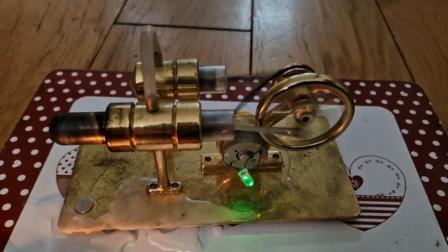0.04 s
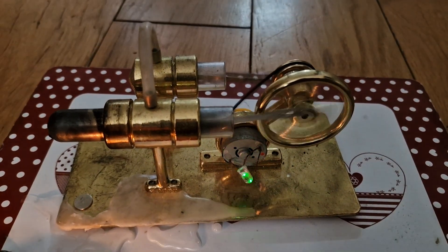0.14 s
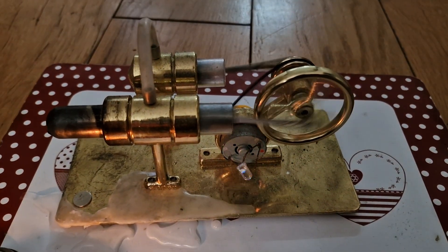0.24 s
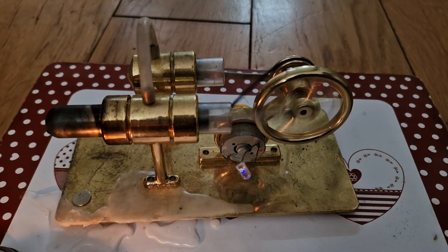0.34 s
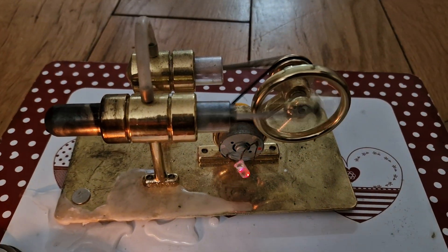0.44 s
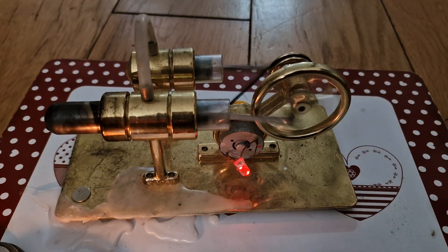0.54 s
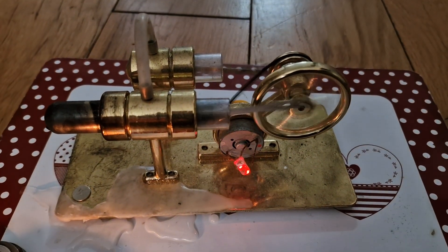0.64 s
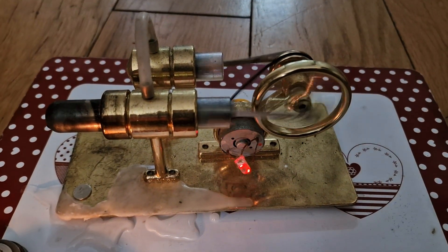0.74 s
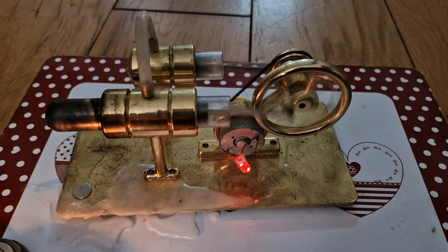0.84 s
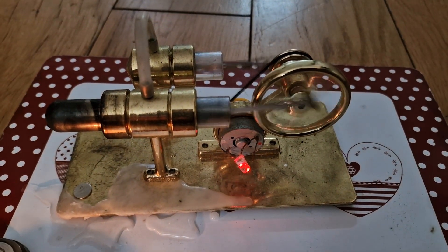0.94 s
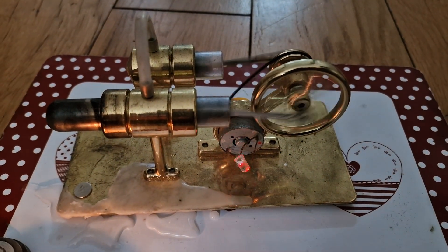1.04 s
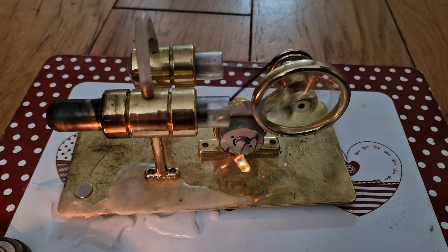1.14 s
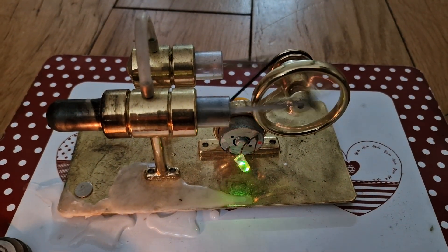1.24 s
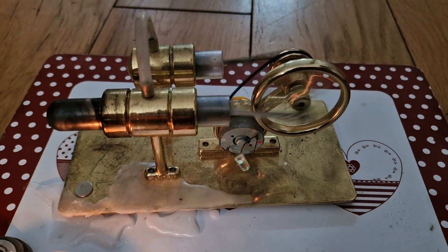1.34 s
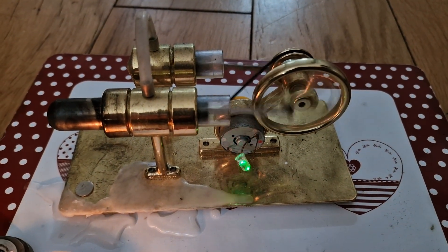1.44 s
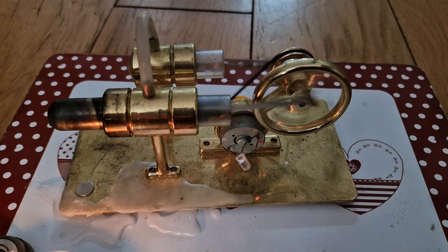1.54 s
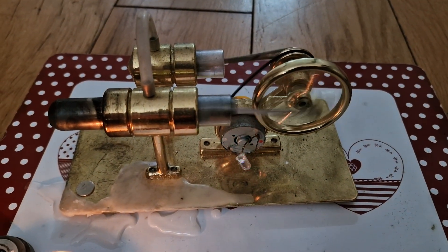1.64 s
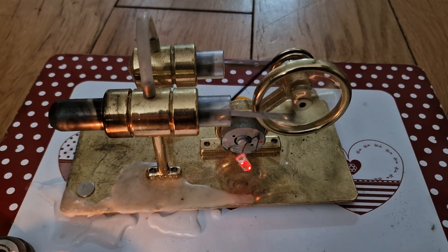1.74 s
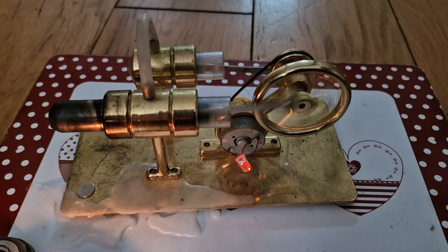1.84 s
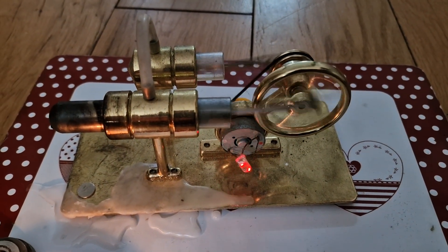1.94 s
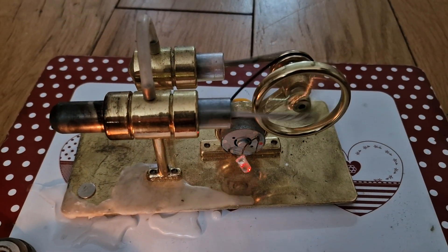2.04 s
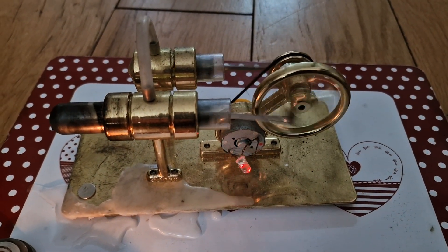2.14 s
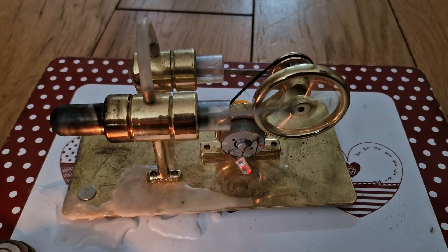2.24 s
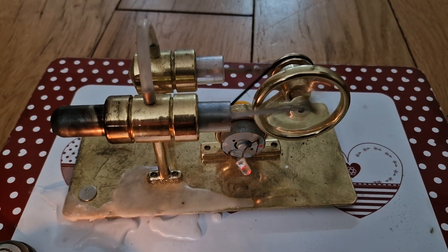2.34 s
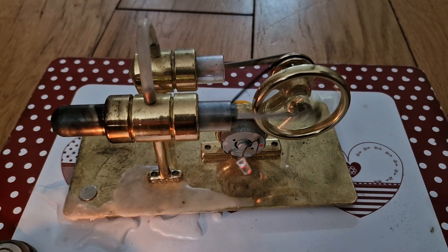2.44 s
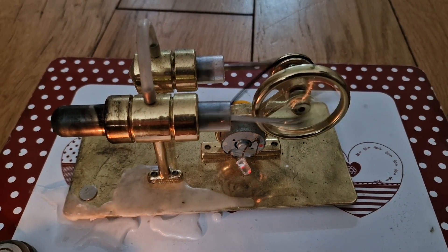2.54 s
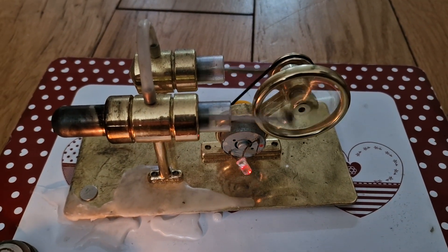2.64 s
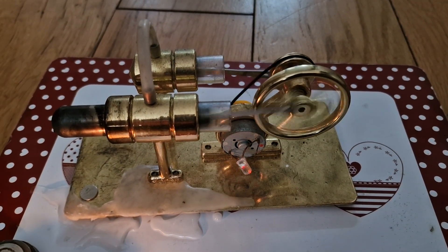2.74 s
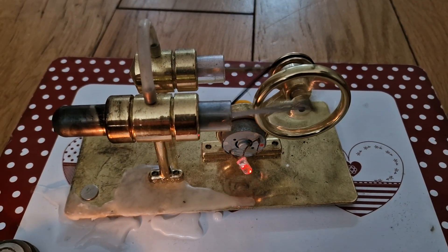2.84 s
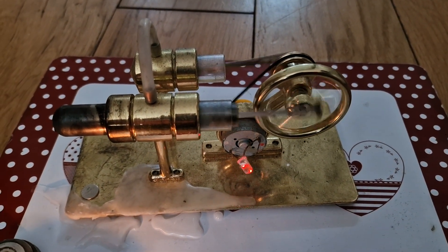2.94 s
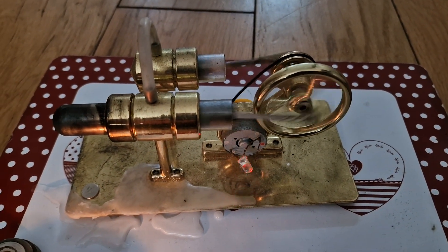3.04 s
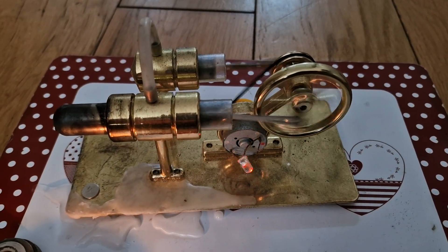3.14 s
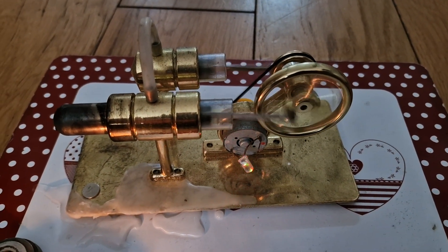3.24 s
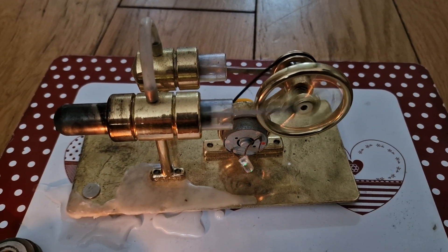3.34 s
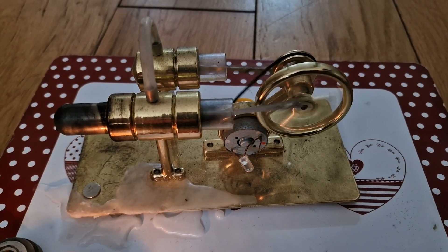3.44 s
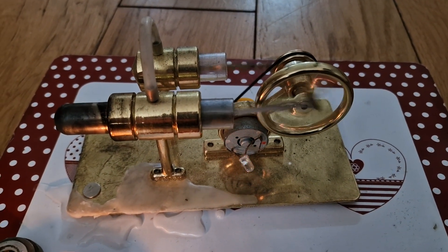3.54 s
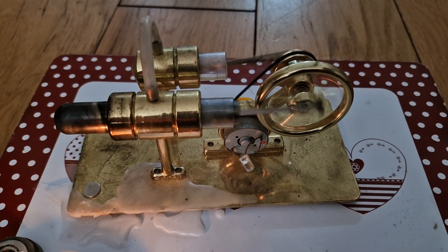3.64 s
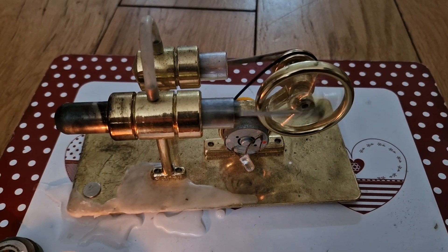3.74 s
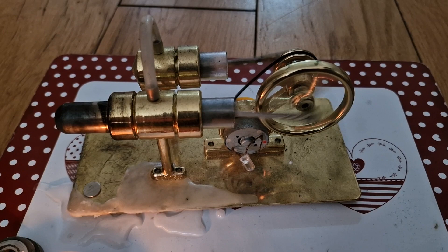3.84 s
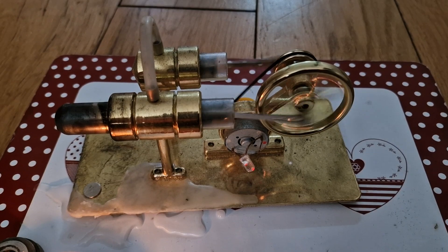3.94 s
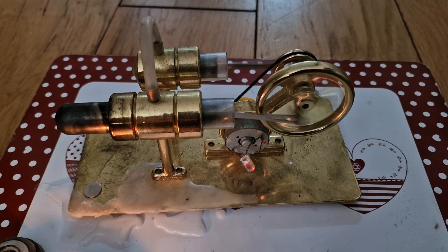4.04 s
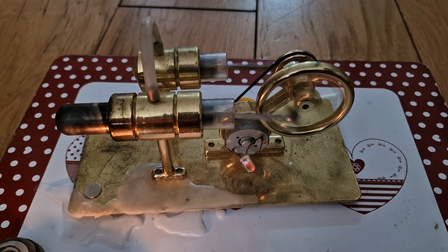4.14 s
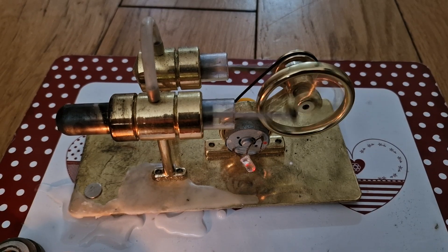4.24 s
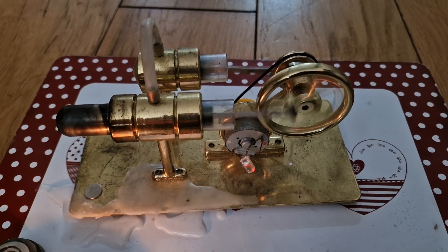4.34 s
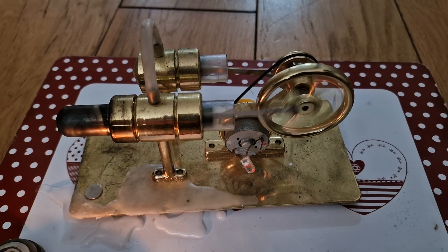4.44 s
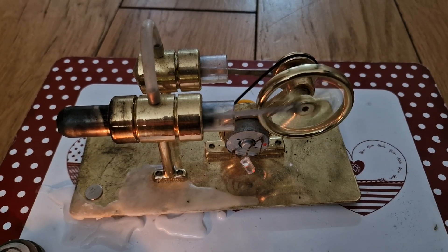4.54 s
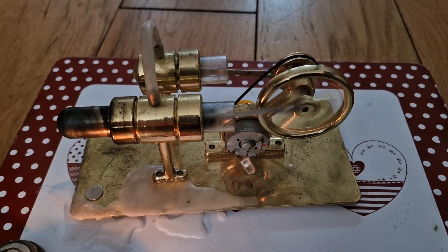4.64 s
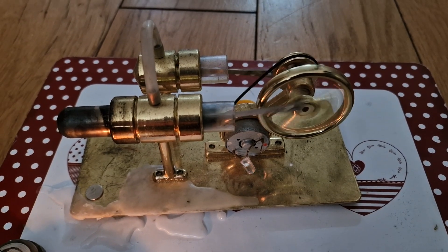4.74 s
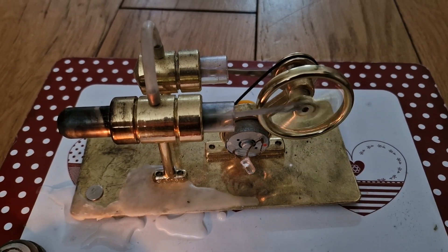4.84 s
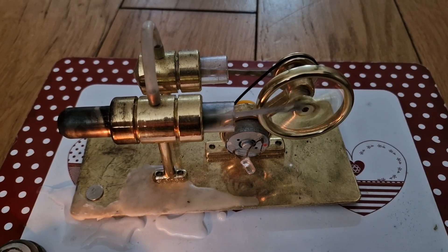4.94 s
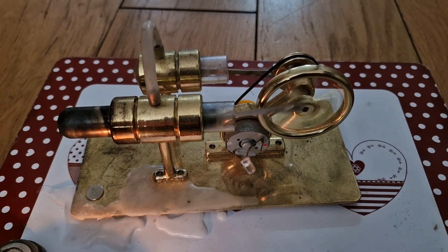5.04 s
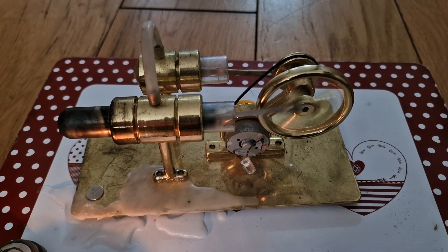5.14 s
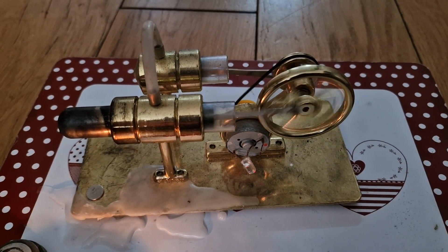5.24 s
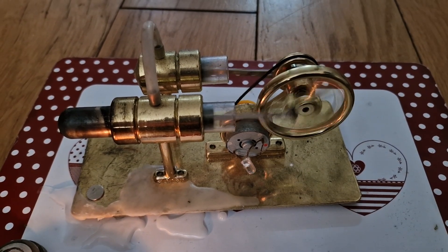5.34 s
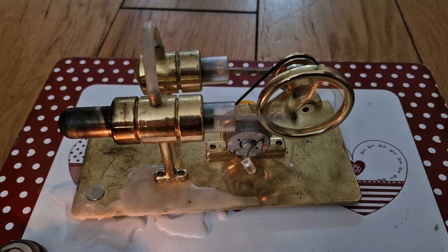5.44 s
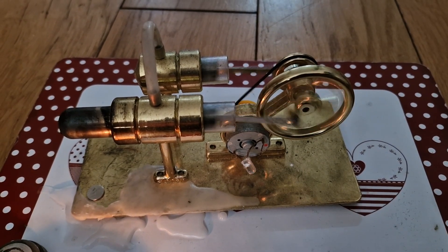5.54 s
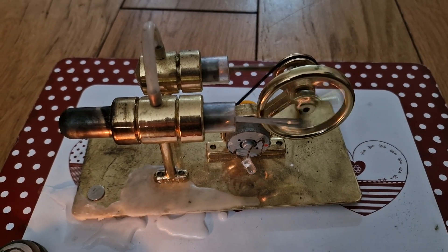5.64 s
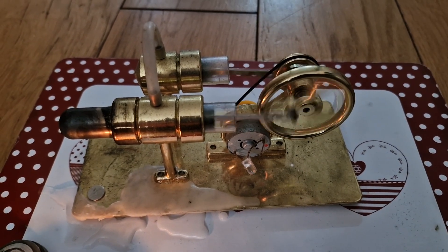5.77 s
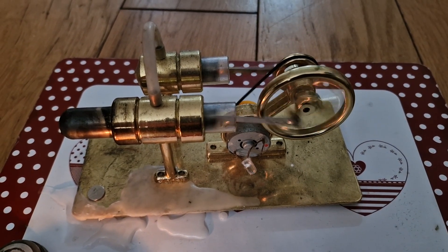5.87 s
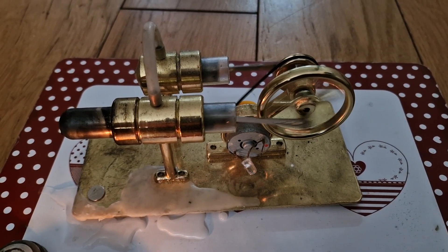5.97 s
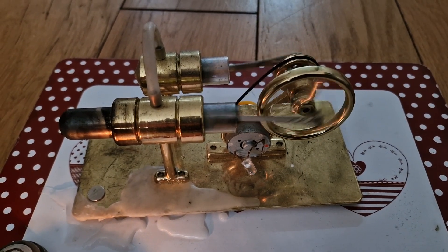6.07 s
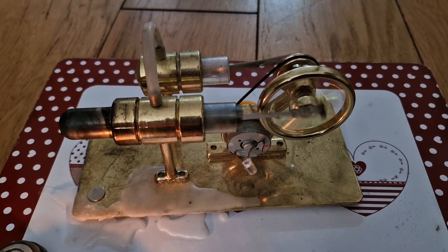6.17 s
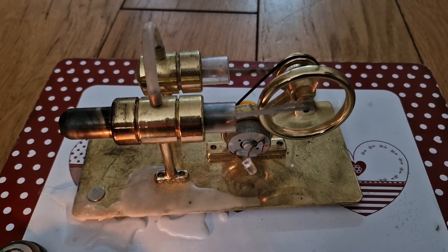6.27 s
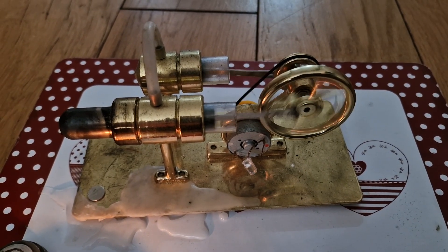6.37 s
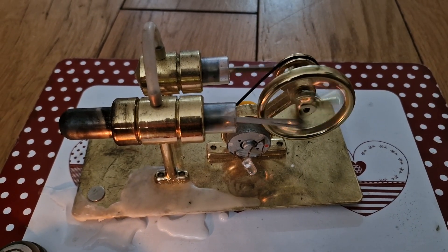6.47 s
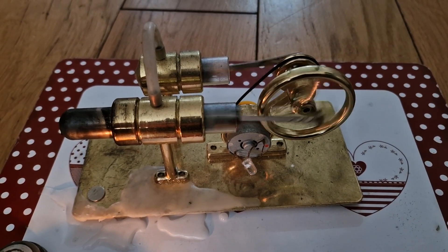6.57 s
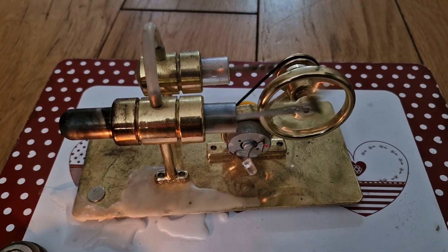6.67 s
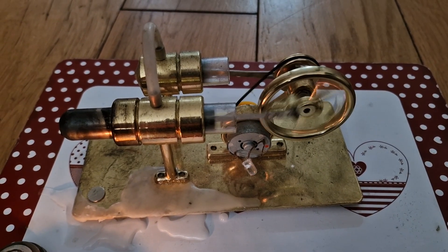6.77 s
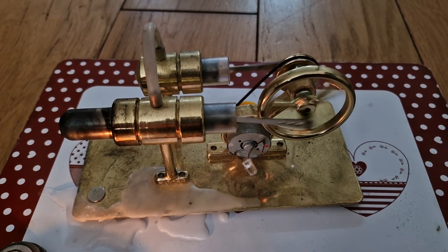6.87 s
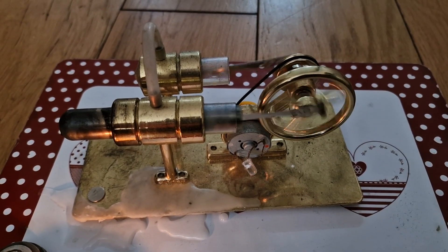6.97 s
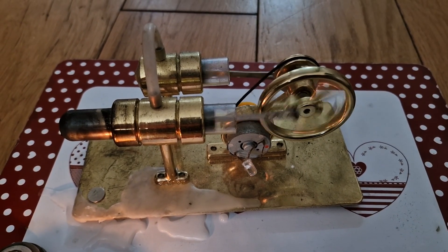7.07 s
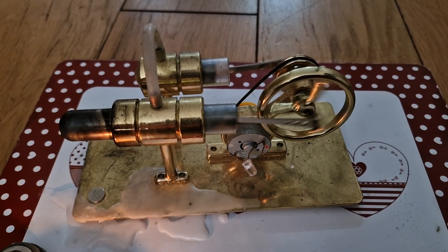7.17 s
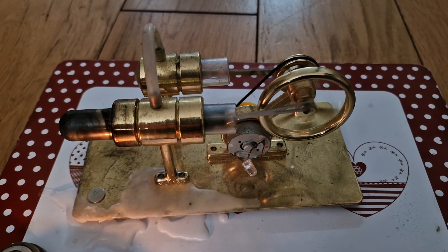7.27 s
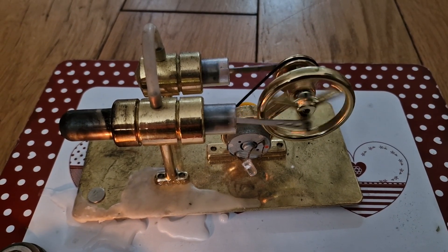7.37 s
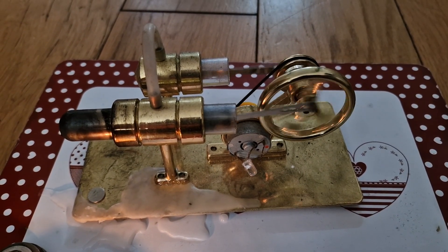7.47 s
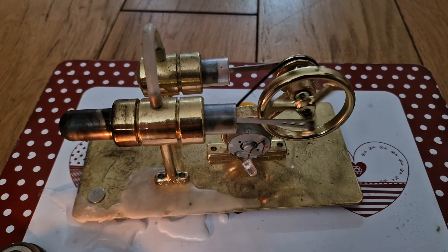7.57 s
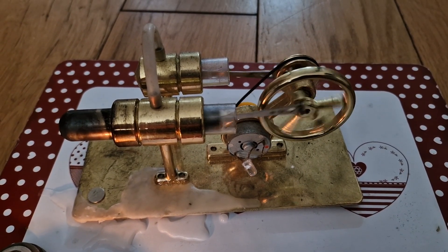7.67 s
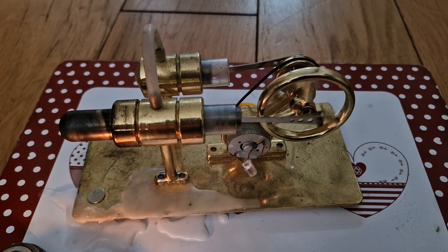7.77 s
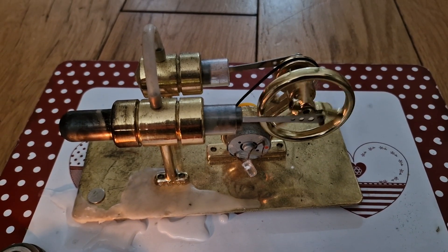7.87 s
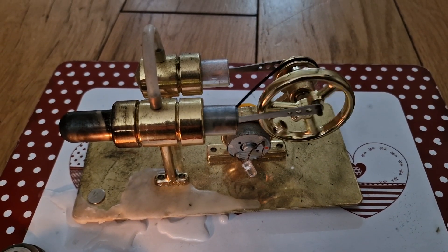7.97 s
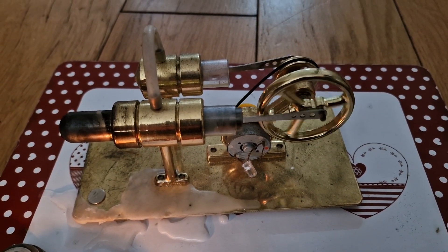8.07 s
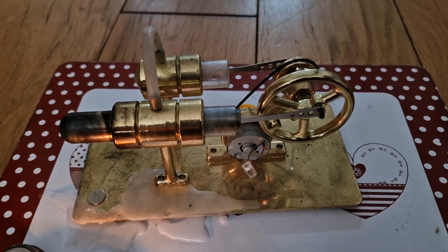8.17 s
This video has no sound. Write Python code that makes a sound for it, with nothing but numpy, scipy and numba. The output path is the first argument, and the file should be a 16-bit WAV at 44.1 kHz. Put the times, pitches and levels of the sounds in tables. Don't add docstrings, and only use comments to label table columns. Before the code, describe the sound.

Close, rapid metallic rattling of a miniature hot-air engine runs down over eight seconds, becomes separate uneven clacks, and stops with a faint sigh.

```python
import sys
import numpy as np
from scipy import signal
from scipy.fft import rfft, irfft
from scipy.io import wavfile
from scipy.ndimage import uniform_filter1d
from numba import njit

SR = 44100
rng = np.random.default_rng(int(sys.argv[2]) if len(sys.argv) > 2 else 0)


def to_wav(sig):
    pcm = np.clip(np.atleast_2d(sig), -1, 1) * 32767
    pcm = np.round(pcm).astype(np.int16)
    wavfile.write(sys.argv[1], SR, pcm.T)


def to_linear_factor(level_db):
    exponent = np.asarray(level_db, float) / 20
    return 10 ** exponent


N = 362042
T = np.arange(N) / SR

FLOOR_HZ = [250, 340, 440]
BASE_HZ = [560, 640, 715, 800, 950, 1175, 1260, 1410, 1600]
CYLINDER_HZ = [1900, 2070, 2250, 2560, 2670, 2790, 2845, 3200]
ROD_HZ = [3600, 3790, 3915, 4062, 4180, 4400, 4700, 4790, 5100, 5400, 5600, 5643, 5998, 6230, 6800, 7300,
          7720]
GLASS_HZ = [8130, 8250, 8355]
PIN_HZ = [9300, 10700, 11600, 12600, 13200, 13720, 14050, 14700, 15450]
AIR_HZ = [4400, 4180]
# t60_s, peak_db, left_minus_right_db, left_lead_rad
FLOOR_MODES = [(0.076, -18, -11, -0.8), (0.029, -12.5, 0, 0), (0.089, -10, -3, 2.5)]
BASE_MODES = [(0.072, -14, 6, 0.8), (0.04, -14, 3.5, 0.4), (0.049, -9.5, 1, -1), (0.063, -11.5, 0.5, -1.36),
              (0.016, -18, -0.5, 1.14), (0.076, -9, 12, 0.1), (0.034, -8.5, 0, -1.14),
              (0.023, -16, 10.5, -0.5), (0.082, -13.5, -7.5, -3.5)]
CYLINDER_MODES = [(0.027, -20, 1.6, 0.6), (0.041, -9.5, 6.9, 2), (0.0065, -14.5, 1.9, 5),
                  (0.09, -11.5, 21.2, 4), (0.059, -4, 0.84, 2.5), (0.14, -2.5, 1.3, -1.5),
                  (0.08, -16.5, 1.4, -5.5), (0.039, -16, 0.41, -6)]
ROD_MODES = [(0.14, 3.5, 4, -2.5), (0.0064, -7.5, 9.5, -0.8), (0.041, 11.5, 1.5, 0.86),
             (0.18, 9.5, -8, 0.96), (0.073, 8.5, 12.5, 3.5), (0.039, 0.5, -21.5, -1.5), (0.019, 6, -5, 4),
             (0.065, -7, 14, -5), (0.0043, -2.5, -1, 3.5), (0.0042, -9, -9, 6.5), (0.088, -6.5, -23.5, 2.5),
             (0.098, -21, -6, 3), (0.026, -3, -10, -2.5), (0.012, -8, -6, 4.5), (0.002, -14.5, 10.5, 1.9),
             (0.018, -10, 1, 0), (0.031, -2.5, -7, 1.5)]
GLASS_MODES = [(0.04, -4, 3.7, 0.66), (0.092, 0, 11, 0.97), (0.122, -1.5, 9.7, 1.4)]
PIN_MODES = [(0.0025, -23.5, 8, -2), (0.032, -19.5, -10.5, 1.5), (0.016, -25.5, -7.5, -2),
             (0.0044, -22.5, 3, -1.5), (0.0031, -38.5, 13, 0), (0.037, -13, 5.5, 1.5), (0.102, -19, 6, -10),
             (0.005, -23.5, 8, -9), (0.025, -18, 8, -7)]
AIR_MODES = [(0.048, 9, -5.5, -2.5), (0.05, 1, 0, 3)]
# angle_turns, spread_turns, level_over_rub_db
FLOOR_HITS = [(.41, 0.032, 11.5), (0.859, 0.04, 9.5)]
BASE_HITS = [(0.489, 0.068, 13.7), (0.895, 0.048, 9.3), (0.98, 0.062, 14)]
POST_HITS = [(.5, 0.013, 1.3), (.72, 0.082, 0.84), (.97, 0.057, 4)]
CYLINDER_HITS = [(0.521, 0.03, 1.4), (.72, 0.14, 2.5), (0.952, 0.028, 0.94)]
ROD_HITS = [(0.53, 0.061, 11.3), (0.99, 0.097, 16.3), (0.206, 0.028, 8.6), (0.682, 0.078, 5.3)]
LINK_HITS = [(0.52, 0.056, 9.7), (0.98, 0.083, 11), (0.22, 0.033, 2.8)]
SLIDE_HITS = [(.56, 0.14, 14)]
AIR_HITS = [(0.545, 0.09, 9.1), (0.0, 0.055, 9.2), (0.16, 0.11, 10.5)]
GLASS_HITS = [(0.182, 0.076, 15), (0.566, 0.016, 25), (.9, 0.096, 11.6)]
PIN_HITS = [(.24, 0.16, 9.1), (.53, 0.083, 4.7), (.93, 0.072, 10.3)]
# time_s, speed_turns_per_s
SPEED = [
    (0, 14.541),
    (2, 12.508),
    (4, 10.848),
    (5, 9.945),
    (6, 8.672),
    (7, 6.719),
    (7.4, 5.194),
    (8.21, 2.397),
]
# time_s, peak_db
TAPS = [(0.0378, -25), (0.0675, -17), (0.138, -18.5), (0.246, -23), (0.2773, -22), (0.322, -23.5),
        (0.459, -18), (0.4938, -31), (0.5287, -19), (0.7038, -25.5), (0.7456, -28), (0.782, -19.5),
        (0.82, -17), (0.8525, -23.5), (0.8939, -30), (0.968, -20), (0.9981, -18), (1.0427, -19.5),
        (1.1164, -18), (1.195, -18.5), (1.2215, -21), (1.271, -13), (1.339, -33), (1.4212, -22.5),
        (1.4518, -15), (1.533, -21), (1.6072, -22.5), (1.649, -20), (1.6806, -23), (1.729, -22),
        (1.762, -21.5), (1.839, -28), (1.8856, -15), (1.921, -23), (1.9664, -23), (2.0488, -16),
        (2.082, -23), (2.1283, -17), (2.164, -26.5), (2.2024, -24), (2.2902, -19.5), (2.3256, -26.5),
        (2.451, -14.5), (2.534, -15.5), (2.6484, -37), (2.7037, -20), (2.8736, -22), (2.957, -21),
        (2.996, -15), (3.047, -26.5), (3.2137, -15.5), (3.3025, -19.5), (3.394, -16), (3.5179, -27),
        (3.569, -19), (3.6002, -35), (3.6556, -16.5), (3.7409, -36), (3.837, -20), (3.963, -31.5),
        (4.0183, -25), (4.0582, -22), (4.1106, -15.5), (4.2052, -19), (4.2413, -37), (4.2682, -19.5),
             (4.3033, -18), (4.3907, -18), (4.433, -22), (4.4907, -21), (4.5336, -28), (4.547, -18.5),
             (4.6229, -22), (4.6773, -24.5), (4.779, -18.5), (4.8215, -24), (4.8405, -19), (4.9377, -20),
             (4.978, -22), (5.029, -17), (5.083, -21), (5.1417, -23), (5.1851, -19.5), (5.233, -23),
             (5.2856, -20.5), (5.5006, -20), (5.6032, -20), (5.7146, -18.5), (5.8377, -20), (5.9417, -16),
             (6.0776, -32), (6.1809, -23), (6.228, -19), (6.3086, -17.5), (6.349, -32), (6.4218, -23),
             (6.4776, -19), (6.558, -22), (6.607, -26), (6.7097, -29), (6.7441, -18.5), (6.8159, -29),
             (6.8324, -18), (6.8865, -15), (7.0274, -28), (7.059, -20.5), (7.1901, -21.5), (7.21, -17.5),
             (7.235, -15.5), (7.2884, -21.5), (7.3036, -14), (7.3563, -27), (7.3727, -22.5), (7.4738, -18),
             (7.5, -21.5), (7.5553, -24.5), (7.5804, -31), (7.6136, -16), (7.7026, -23), (7.7134, -16)]
# time_s, peak_db
THUMPS = [(0.064, -28), (0.135, -25.5), (0.201, -33), (0.244, -37), (0.276, -31.5), (0.387, -35),
          (0.453, -24.5), (0.487, -24), (0.53, -36), (0.56, -26), (0.601, -35), (0.626, -41), (0.748, -35),
          (0.776, -21), (0.82, -24.5), (0.85, -27.5), (0.995, -23.5), (1.041, -32), (1.189, -29),
          (1.22, -25), (1.295, -24), (1.415, -31), (1.447, -24.5), (1.57, -30), (1.641, -31),
          (1.677, -26.5), (1.72, -33), (1.755, -26), (1.834, -31), (1.884, -37), (1.913, -27), (1.958, -31),
          (1.993, -24), (2.072, -25.5), (2.153, -29), (2.192, -30), (2.236, -25), (2.313, -39),
          (2.358, -40), (2.533, -32.5), (2.562, -30.5), (2.611, -40), (2.645, -29.5), (2.689, -32),
          (2.728, -40), (2.817, -31), (2.853, -30), (2.899, -25), (2.983, -28.5), (3.07, -34.5),
          (3.122, -36), (3.155, -30), (3.202, -27), (3.242, -35), (3.297, -29.5), (3.335, -28),
          (3.418, -29), (3.509, -29), (3.561, -38), (3.596, -31.5), (3.649, -28), (3.689, -27),
               (3.82, -35.5), (3.963, -29.5), (4.005, -31), (4.055, -25.5), (4.204, -28.5), (4.24, -23.5),
               (4.333, -29), (4.389, -32), (4.43, -24), (4.478, -36), (4.582, -31), (4.613, -32),
               (4.669, -37), (4.715, -35.5), (4.775, -29.5), (4.874, -32.5), (4.913, -30.5), (4.972, -27.5),
               (5.015, -30.5), (5.075, -37.5), (5.174, -32), (5.221, -27), (5.284, -24.5), (5.328, -23.5),
               (5.386, -28), (5.428, -33.5), (5.486, -33), (5.54, -27.5), (5.601, -23.5), (5.716, -27.5),
               (5.824, -28.5), (5.932, -32), (5.987, -31), (6.045, -36), (6.103, -31.5), (6.174, -29),
               (6.339, -43), (6.415, -42.5), (6.543, -32.5), (6.728, -34.5), (6.817, -30), (6.959, -33.5),
               (7.022, -30), (7.114, -30.5), (7.183, -33), (7.279, -33), (7.351, -34.5), (7.409, -39.5),
               (7.459, -30.5), (7.55, -29), (7.6, -39), (7.684, -34)]
# time_s, peak_db
ROCKING = [(7.775, -39), (7.785, -34), (7.814, -39), (7.952, -39), (7.959, -43.5), (7.9664, -37.5),
           (7.975, -46.5), (8.0017, -61), (8.0207, -45), (8.039, -32), (8.047, -39), (8.056, -43),
           (8.067, -45), (8.087, -43), (8.118, -36.5), (8.125, -36), (8.133, -54), (8.148, -35),
           (8.157, -51)]
# time_s, extra_db, length_s
HEAVES = [
    (0.005, 5.5, 0.017),
    (7.06, 0, 0.037),
    (7.16, -3.5, 0.061),
    (7.25, 4, 0.032),
    (7.32, 6, 0.018),
    (7.5, 0.5, 0.066),
    (7.7, 4, 0.031),
    (7.425, -15, 0.02),
    (7.835, 22, 0.067),
]
# time_s, extra_db, length_s
BASE_HEAVES = [
    (0.03, 3, 0.053),
    (6.56, 2, 0.027),
    (7.56, 4, 0.018),
    (7.705, 9.5, 0.024),
]
# time_s, extra_db, length_s
CYLINDER_HEAVES = [
    (7.32, 2.5, 0.034),
    (7.51, 2, 0.025),
    (7.76, 2.6, 0.048),
    (7.83, 10, 0.05),
]
# angle_turns, shift_hz
AIR_SHIFT = [(0, -250), (.15, -50), (.35, 130), (.5, 450), (.6, -50), (.72, -400), (.9, -450), (1, -250)]
# time_s, level_db
SIGH = [
    (7.72, -46),
    (7.8, -37),
    (7.83, -34),
    (7.88, -44.5),
    (8.0, -69),
]
# time_s, peak_db, pitch_hz, length_s
SQUEAKS = [(0.2185, -29, 8200, 0.027), (0.2187, -13, 8260, 0.012), (0.338, -28, 8400, 0.013),
           (0.357, -13.5, 8240, 0.02), (0.432, -13, 8250, 0.012), (0.773, -22, 8180, 0.013),
           (1.231, -20.5, 8280, 0.018), (1.569, -30, 8200, 0.012), (1.722, -28, 8070, 0.022),
           (2.583, -15, 8280, 0.017), (2.6654, -8.5, 8220, 0.0068), (2.6677, -10.5, 8250, 0.022),
           (2.6735, -7, 8310, 0.011), (2.953, -24, 8100, 0.0092), (3.007, -33, 8200, 0.022),
           (3.178, -23.5, 8260, 0.017), (7.285, -35, 8400, 0.012), (3.47, -22, 8130, 0.018),
           (3.616, -13, 8240, 0.024), (3.741, -25.5, 8150, 0.014), (4.877, -25, 8200, 0.0097),
           (5.284, -27, 8250, 0.013), (5.461, -22, 8260, 0.02), (5.7833, -21.5, 8280, 0.02),
           (5.896, -14.5, 8250, 0.026), (6.1336, -20, 8250, 0.017), (7.0244, -22, 8170, 0.0048),
           (7.227, -23.5, 8210, 0.034)]
# start_s, end_s, pitch_hz, level_db
DRONES = [
    (0, .6, 100, -56),
    (1.0, 1.494, 84, -52.5),
    (4.66, 5.4, 96, -56),
    (5.5, 6.1, 102, -57.5),
    (6.628, 7.25, 82, -55),
    (6.7, 8.2, 109, -59),
    (6.3, 8.19, 198, -65),
]
# time_s, extra_db, length_s
HUM_SWELLS = [
    (0.2, 5, .3),
    (3.5, 5, .6),
    (5.3, 1, 0.3),
    (5.9, 8, 0.25),
    (6.45, 16.5, 0.1),
    (6.8, 13, 0.089),
    (7.08, 12, 0.07),
    (7.5, 7, 0.41),
]
# time_s, pitch_hz, level_db
FAR_MOTOR = [
    (2.4, 59.5, -56),
    (4.0, 59.3, -51),
    (4.15, 66.8, -50),
    (4.9, 74.2, -48),
    (5.0, 77.2, -57),
    (5.45, 83, -57),
    (5.6, 80.2, -49),
    (5.95, 62, -51),
]
# pitch_hz, level_db
TRAFFIC = [(22, -24), (38, -5.5), (60, -2.5), (85, -1.0), (125, -7.5), (190, 0.5), (250, -10.0),
           (330, -46.0), (700, -33), (3000, -23), (16000, -52.0)]

# full_speed_db, db lost per turn/s lost, db lost at dead centre in a crawl, db gained in a crawl
ROD_LAW, BASE_LAW, CYLINDER_LAW = (-28.5, 0.34, -1, -7), (-41.5, 0.84, 12, 1), (-40, 0.53, 25, 9)
PIN_LAW, AIR_LAW, GLASS_LAW = (-42.5, 0.5, 27, 8), (-32.5, -0.75, -7, -5.5), (-34, 0.5, 26, 4.5)
SLIDE_LAW = (-54.5, 0.24, 25.5, 15)
LINK_LAW = (-35.5, 1.16, 27, 10.5)
# rods_db, base_db, cylinders_db, glass_db, pins_db over its own peak
TAP_SHAKES_DB = (1.5, -34.5, -18, -30, -20.5)
THUMP_SHAKES_DB = (-29, -1.5, -0.5, -30.5, -19)
ROCK_SHAKES_DB = (-6.5, -6.5, 1.5, -24, -8.5)
RODS, BASE, CYLINDERS, GLASS, PINS = range(5)


def engine():
    return floor_and_base() + cylinders() + rods() + air_column() + glass_tube() + pins()


def rods():
    heaves = bumps(HEAVES)
    long_rods = part(ROD_HZ[:8], ROD_MODES[:8], ROD_HITS, loudness(*ROD_LAW) + heaves, column=RODS, rub_db=-7,
                     knock_db=-1, rate=1300, grain_db=3.0, alike=0.84, scatter_db=1.2, lag=0.045)
    links = part(ROD_HZ[8:], ROD_MODES[8:], LINK_HITS, loudness(*LINK_LAW) + heaves, column=RODS, rub_db=1.0,
                 knock_db=-14, rate=3200, grain_db=2.1, alike=0.63, scatter_db=4.0, lag=0.037)
    slide = part(ROD_HZ[10:12], ROD_MODES[10:12], SLIDE_HITS, loudness(*SLIDE_LAW), column=GLASS, rub_db=-3.5,
                 knock_db=-24, rate=1500, grain_db=7.5, alike=0.76, scatter_db=1.0)
    return long_rods + links + slide


def floor_and_base():
    level_db = loudness(*BASE_LAW) + bumps(BASE_HEAVES)
    floor = part(FLOOR_HZ, FLOOR_MODES, FLOOR_HITS, level_db, column=BASE, rub_db=-9.5,
                 knock_db=-14.5, rate=900, grain_db=0, alike=1.0)
    base = part(BASE_HZ, BASE_MODES, BASE_HITS, level_db, column=BASE, rub_db=-1, knock_db=-0.5, rate=1400,
                grain_db=2.0, alike=0.89, lag=0.0055, scatter_db=1.0, chatter_s=0.0046)
    return floor + base


def cylinders():
    level_db = loudness(*CYLINDER_LAW) + bumps(CYLINDER_HEAVES)
    post = part(CYLINDER_HZ[:3], CYLINDER_MODES[:3], POST_HITS, level_db, column=CYLINDERS, rub_db=-5.5,
                knock_db=-9.0, rate=1000, grain_db=4.5, alike=0.5)
    walls = part(CYLINDER_HZ[3:], CYLINDER_MODES[3:], CYLINDER_HITS, level_db, column=CYLINDERS, rub_db=-1.5,
                 knock_db=-15, rate=1200, grain_db=1.0, alike=0.59, lag=-0.34)
    return post + walls


def air_column():
    running_db = loudness(*AIR_LAW) + bumps(HEAVES)
    level_db = np.where(T > SIGH[0][0], along(SIGH, 1) + 9, running_db)
    shift_hz = np.interp(crank() % 1, *np.transpose(AIR_SHIFT))
    return part(AIR_HZ, AIR_MODES, AIR_HITS, level_db, column=RODS, rub_db=-4.5, knock_db=-10,
                rate=2500, grain_db=2.5, alike=1.0, shift_hz=shift_hz)


def glass_tube():
    return part(GLASS_HZ, GLASS_MODES, GLASS_HITS, loudness(*GLASS_LAW), column=GLASS, rub_db=-9.5,
                knock_db=14.5, rate=800, grain_db=5.5, alike=0.93, scatter_db=1.6)


def pins():
    return part(PIN_HZ, PIN_MODES, PIN_HITS, loudness(*PIN_LAW), column=PINS, rub_db=0.0,
                knock_db=5.5, rate=1800, grain_db=3.5, alike=0.69)


def part(tones, modes, hits, level_db, column, rub_db, knock_db, rate, grain_db, alike, lag=0.,
         scatter_db=3., shift_hz=None, chatter_s=0.0036):
    place, grain = rng.random((2, int(rate * N / SR)))
    at = ((np.arange(len(place)) + place) * (N - 1) / len(place)).astype(np.int64)
    size = to_linear_factor(grain_db * np.minimum(-np.log(grain), 3.5))
    size_power = np.mean(size ** 2)
    knock = knocks(column, at, chatter_s) * to_linear_factor(knock_db)
    luck = rng.standard_normal((len(hits), 100, 2))
    angle = crank()[at]
    rub = np.interp(at / SR, [0, 6, 8], [1, .8, .3])
    turning = np.ones(1) if shift_hz is None else np.exp(2j * np.pi * np.cumsum(shift_hz) / SR)
    strongest_db = max(mode[1] for mode in modes)
    out, power = 0, 0
    for hz, (t60, peak_db, pan_db, lead) in zip(tones, modes):
        turns = angle + lag * np.log2(hz / np.median(tones))
        mode_luck = 1.2 * luck + 1.87 * rng.standard_normal(luck.shape)
        steady = slack(hits, turns, rub, mode_luck, scatter_db)
        near, far = rng.standard_normal((2, len(at))) * size * steady * to_linear_factor(level_db[at] + rub_db)

        favoured = to_linear_factor((peak_db - strongest_db) / 2)
        swing = 2 * np.pi * (hz * at / SR + rng.random((2, 1)))
        stray = 1.107 * rng.standard_normal((2, len(at)))
        firm = np.exp(1j * (swing + stray)) * 0.61 * knock * favoured * np.sqrt(size_power)
        near, far = near + firm[0], far + firm[1]

        pushes = np.array([near, alike * near + np.sqrt(1 - alike ** 2) * far]) + 0j
        pushes = pushes * np.exp(-1j * np.array([[0], [lead]])) / turning[at % len(turning)]
        pole = np.exp((2j * np.pi * hz - 2.53 * np.log(1000) / t60) / SR)
        sides = ring(at, pushes, pole) * turning
        out = out + to_linear_factor(peak_db + np.array([[pan_db], [-pan_db]]) / 2) * sides.real
        power += to_linear_factor(2 * peak_db) * (1 - abs(pole)) / 8
    return out / np.sqrt(power * size_power * rate / SR)


def slack(hits, turns, rub, luck, scatter_db):
    strength = rub
    for (angle, spread, db), draws in zip(hits, luck):
        force, late = draws[np.floor(turns - angle + .5).astype(int) + 2].T
        away = ((turns - angle + .5) % 1 - .5) / spread - 0.26 * late
        away = np.where(away < 0, 1.25 * away, away)
        lump_db = db + scatter_db * np.clip(force, -2.5, 1.3)
        strength = strength + to_linear_factor(lump_db) * np.exp(-away ** 2)
    return strength / np.sqrt(np.mean(strength ** 2))


def knocks(column, at, chatter_s):
    jump = np.zeros(N)
    kinds = [(TAPS, TAP_SHAKES_DB), (THUMPS, THUMP_SHAKES_DB),
             (ROCKING, ROCK_SHAKES_DB)]
    for rows, shakes_db in kinds:
        for s, db in rows:
            jump[int(s * SR)] += to_linear_factor(db + shakes_db[column])
    jump = uniform_filter1d(jump, int(0.00086 * SR) + 1)
    return signal.lfilter([1], [1, -np.exp(-1 / (chatter_s * SR))], jump)[at]


@njit
def ring(at, push, pole):
    out, k = np.zeros((2, N), np.complex128), 0
    a0 = a1 = b0 = b1 = 0j
    gain = (1 - abs(pole)) ** 2
    for i in range(N):
        a0, a1 = a0 * pole + 1e-18, a1 * pole + 1e-18
        while k < len(at) and at[k] == i:
            a0, a1, k = a0 + push[0, k], a1 + push[1, k], k + 1
        b0, b1 = b0 * pole + gain * a0, b1 * pole + gain * a1
        out[0, i], out[1, i] = b0, b1
    return out


def loudness(full_db, slowing_db, dead_db, labour_db):
    speed = along(SPEED, 1)
    dead_turns, dead_spread_turns = 0.14, 0.23
    dead = np.exp(-(((crank() - dead_turns + .5) % 1 - .5) / dead_spread_turns) ** 2)
    crawl = np.clip(7.63 - speed, 0, 3) / 3
    stall_db = np.clip(229 * (T - 7.76), 0, 27)
    return full_db - slowing_db * (speed[0] - speed) + crawl * (labour_db - dead_db * dead) - stall_db


def crank():
    return -.046 + np.cumsum(along(SPEED, 1)) / SR


def bumps(rows):
    return sum(db * np.exp(-((T - s) / length) ** 2) for s, db, length in rows)


def along(table, column):
    return np.interp(T, *np.array(table)[:, [0, column]].T)


def squeaks():
    out = np.zeros((2, N))
    for s, db, hz, length in SQUEAKS:
        t = np.arange(int(3.1 * length * SR)) / SR
        swell = (t / length * 2.0 * np.exp(1 - 2.346 * t / length)) ** 3
        start = int((s - .004) * SR)
        for side, (lead, pan_db) in enumerate([(0, 5), (.6, -2.5)]):
            tone = np.cos(2 * np.pi * hz * t - lead)
            tone += 0.42 * np.cos(2 * np.pi * (hz + 110) * t - 3 * lead)
            out[side, start:start + len(t)] += to_linear_factor(db + pan_db - 0.5) * swell * tone
    return out


def dynamo():
    turns = crank()
    speed = np.gradient(turns) * SR / 12
    cogs = to_linear_factor(-58.5) * np.sin(2 * np.pi * 11 * turns) + to_linear_factor(-64) * np.sin(2 * np.pi * 14 * turns)
    return speed * cogs


def room(x, t60, wet_db):
    t = np.arange(int(.4 * SR)) / SR
    tail = rng.standard_normal((2, len(t))) * np.exp(-np.log(1000) * t / t60) * (t > .004)
    tail /= np.sqrt(np.sum(tail ** 2, axis=1, keepdims=True))
    return x + to_linear_factor(wet_db) * signal.fftconvolve(x, tail, axes=1)[:, :N]


def drones():
    out = 0
    for start, end, hz, db in DRONES:
        on = uniform_filter1d(1. * (T > start) * (T < end), size=6000)
        waver = slow_wander()
        tone = np.sin(2 * np.pi * np.cumsum(hz + 1.15 * waver) / SR)
        out = out + on * to_linear_factor(db + 4.1 * waver[::-1]) * tone
    return out


def far_motor():
    on = uniform_filter1d(1. * (T > FAR_MOTOR[0][0]) * (T < FAR_MOTOR[-1][0]), size=4000)
    return on * to_linear_factor(along(FAR_MOTOR, 2) + 1) * np.sin(2 * np.pi * np.cumsum(along(FAR_MOTOR, 1)) / SR)


def idling_hum():
    hz = 54.5 + 1.67 * slow_wander()
    return to_linear_factor(-56.5 + bumps(HUM_SWELLS)) * np.sin(2 * np.pi * np.cumsum(hz) / SR)


def slow_wander():
    return np.interp(T, np.arange(50) / 5, rng.standard_normal(50))


def traffic():
    hz = np.fft.rfftfreq(N, 1 / SR) + 1
    colour_hz, colour_db = np.transpose(TRAFFIC)
    colour = to_linear_factor(np.interp(np.log(hz), np.log(colour_hz), colour_db))
    mid, side = rfft(rng.standard_normal((2, N))) * colour
    bass = 1 / (1 + (hz / 260) ** 6)
    both = mid + np.array([[1], [-1]]) * side * np.clip((hz / 500) ** 2, .09, 1)
    scale = np.sqrt(np.mean(irfft(mid * bass, N) ** 2))
    rumble = irfft(both * bass, N) / scale
    hiss = irfft(both * (1 - bass), N) / scale
    return rumble * to_linear_factor(-52.5 + .7 * (3.5 - T)) + hiss * to_linear_factor(-54.0)


def scene():
    indoors = room(engine() + squeaks(), t60=0.32, wet_db=-11.0) + dynamo()
    return indoors + drones() + idling_hum() + far_motor() + traffic()


def low_pass(x):
    return signal.sosfilt(signal.butter(12, 15950, fs=SR, output="sos"), x)


def record(dry):
    for hz, width_hz, depth in [(2902, 215, 0.83), (9555, 1550, 0.81)]:
        dry = dry - depth * signal.lfilter(*signal.iirpeak(hz, hz / width_hz, fs=SR), dry)
    return low_pass(dry)


dry = scene()
out = record(dry)
to_wav(out)
```